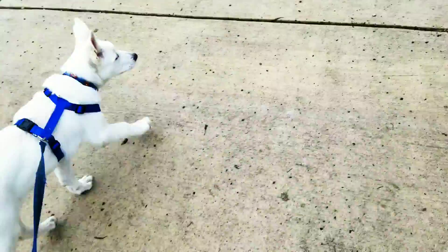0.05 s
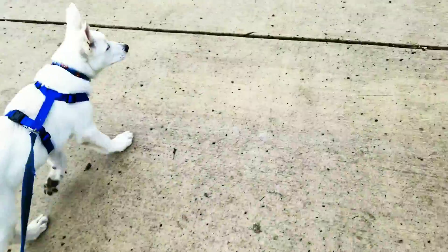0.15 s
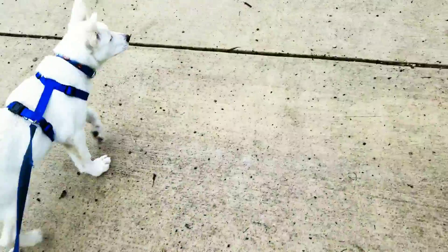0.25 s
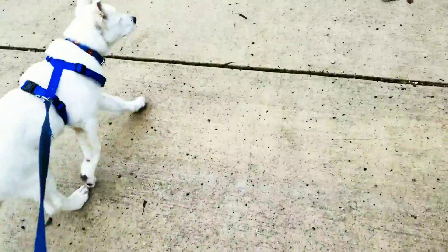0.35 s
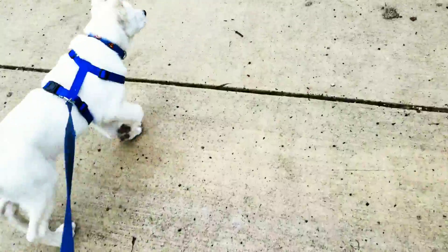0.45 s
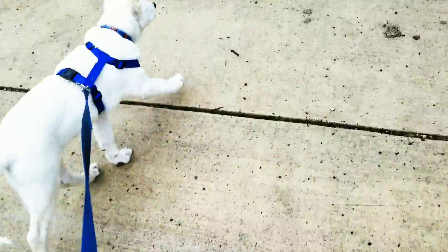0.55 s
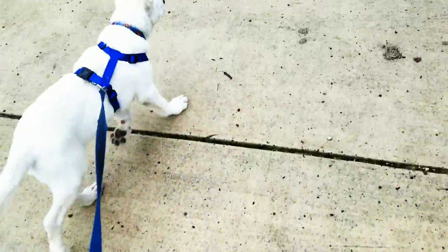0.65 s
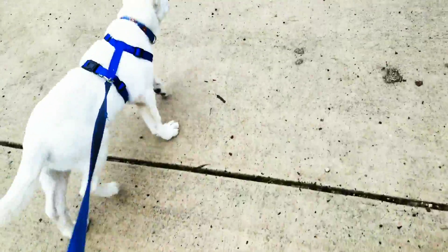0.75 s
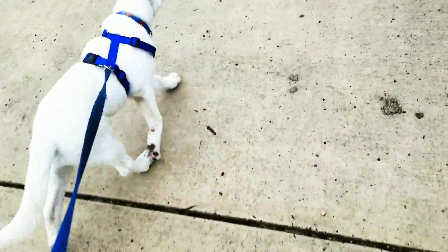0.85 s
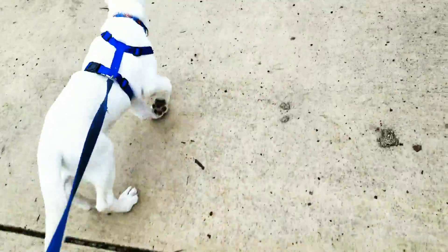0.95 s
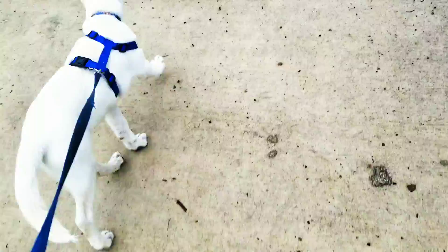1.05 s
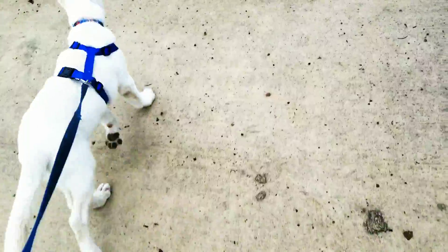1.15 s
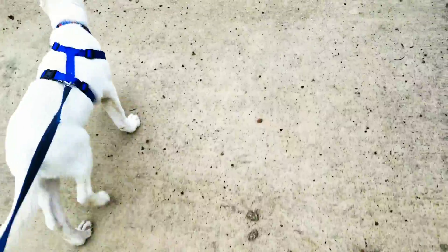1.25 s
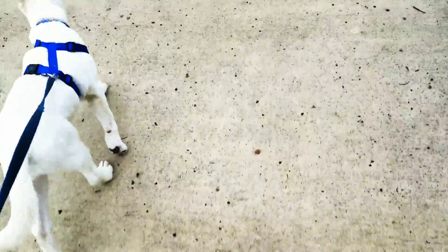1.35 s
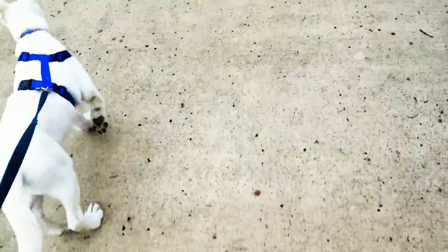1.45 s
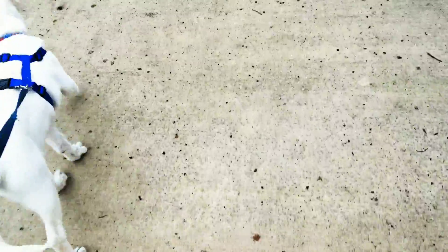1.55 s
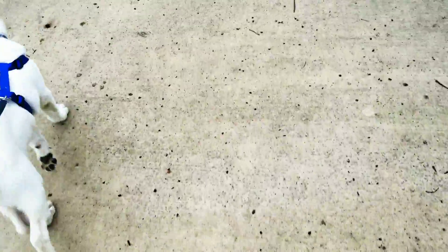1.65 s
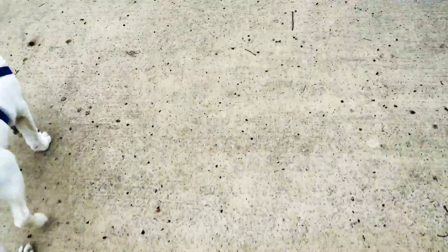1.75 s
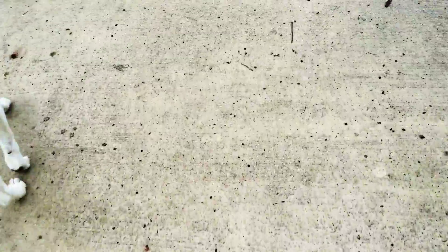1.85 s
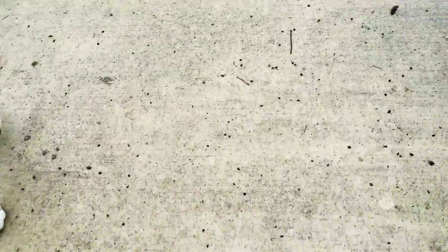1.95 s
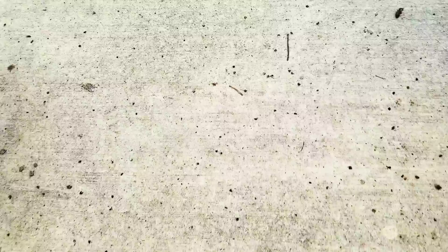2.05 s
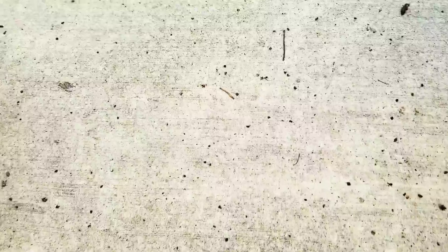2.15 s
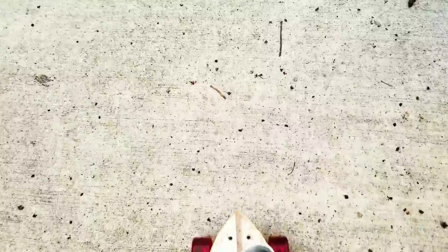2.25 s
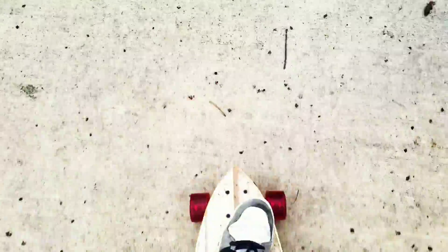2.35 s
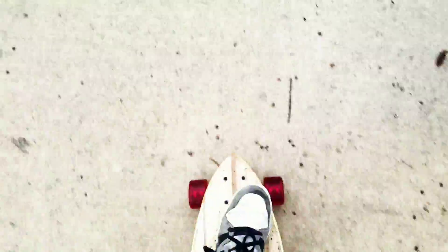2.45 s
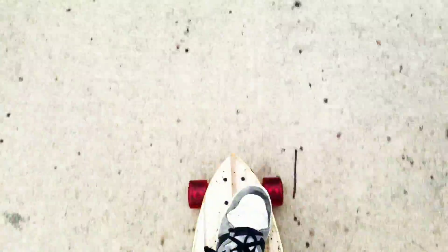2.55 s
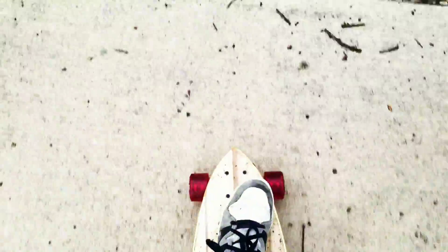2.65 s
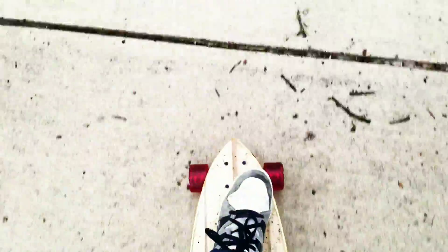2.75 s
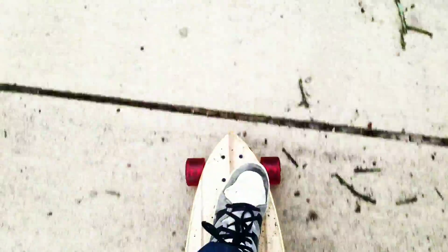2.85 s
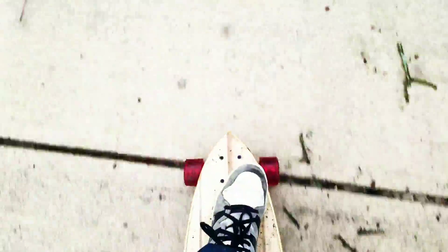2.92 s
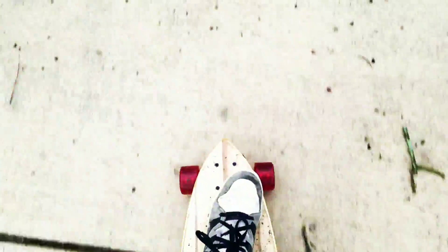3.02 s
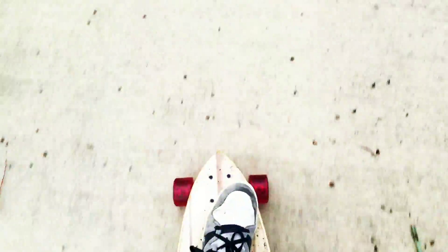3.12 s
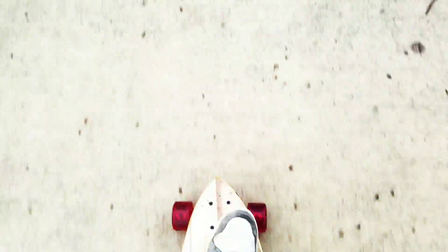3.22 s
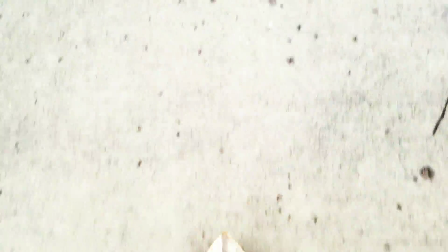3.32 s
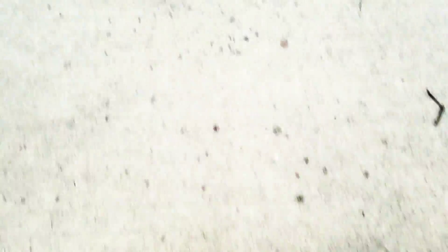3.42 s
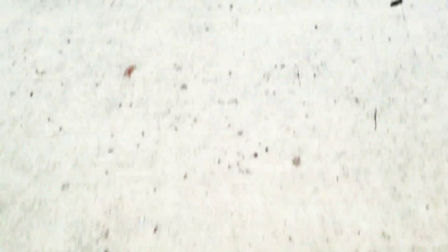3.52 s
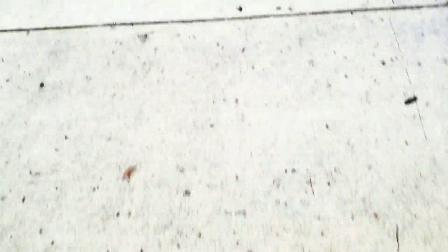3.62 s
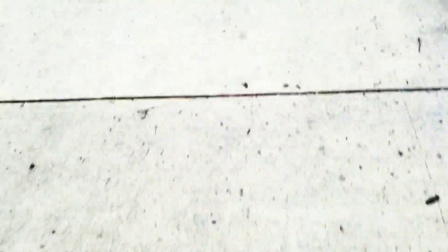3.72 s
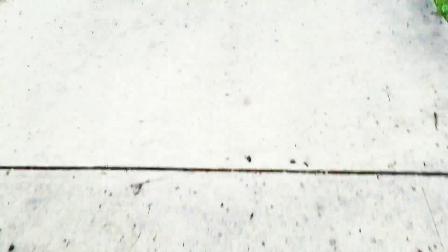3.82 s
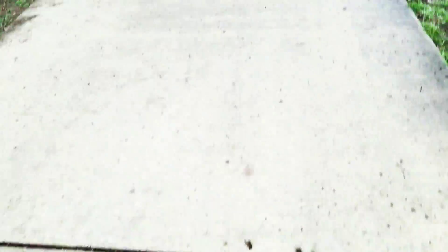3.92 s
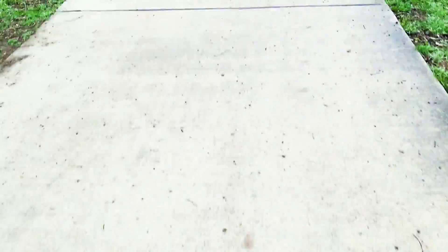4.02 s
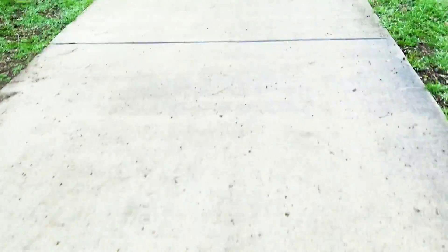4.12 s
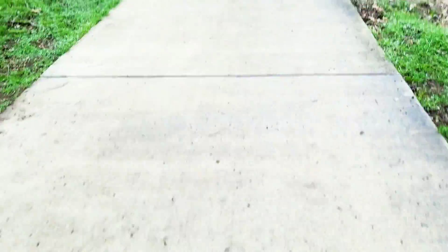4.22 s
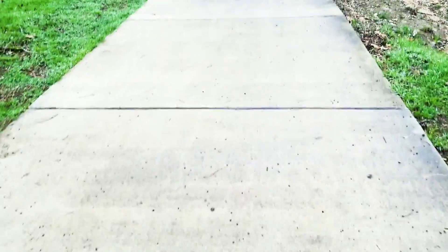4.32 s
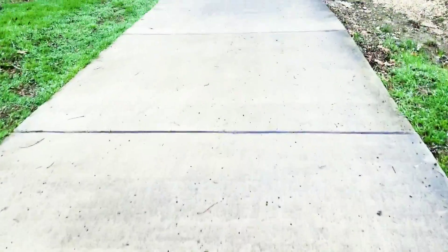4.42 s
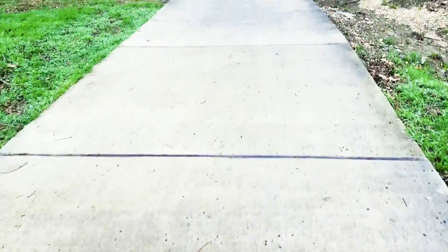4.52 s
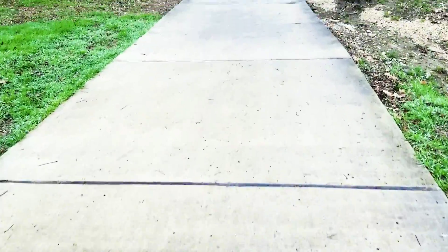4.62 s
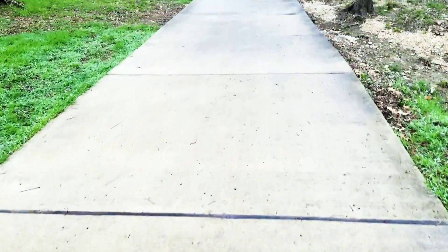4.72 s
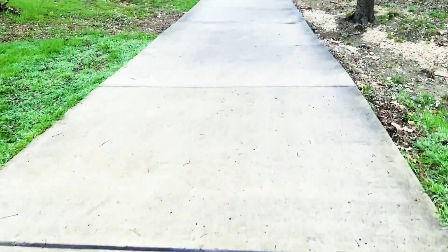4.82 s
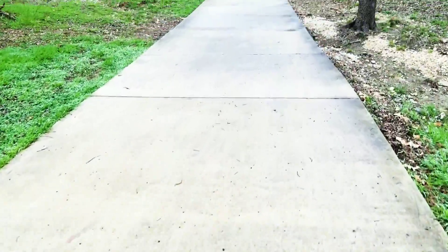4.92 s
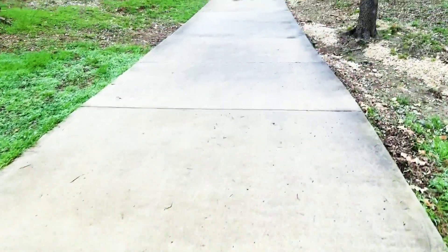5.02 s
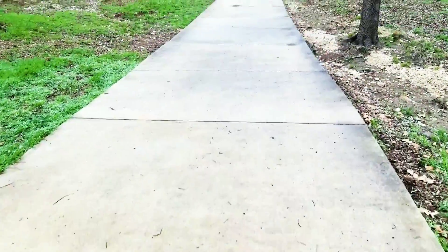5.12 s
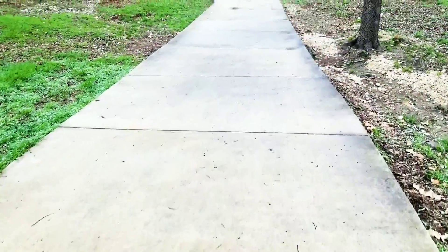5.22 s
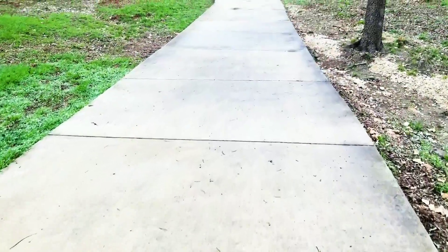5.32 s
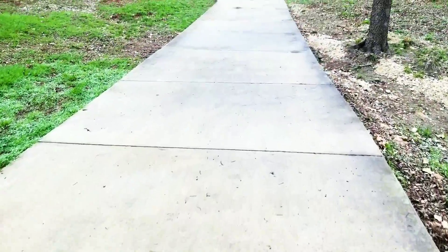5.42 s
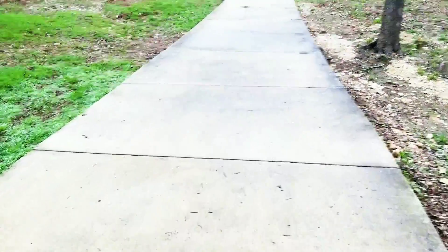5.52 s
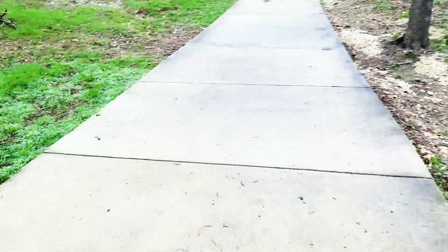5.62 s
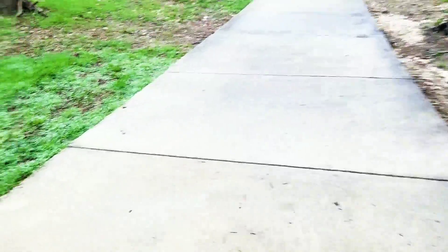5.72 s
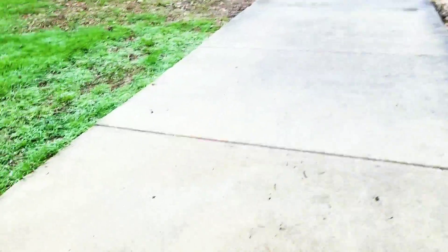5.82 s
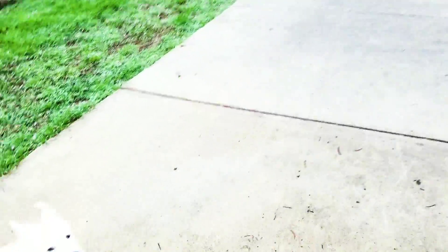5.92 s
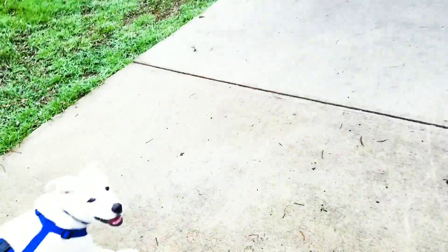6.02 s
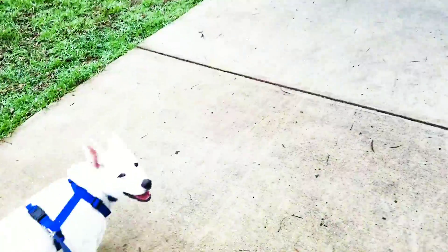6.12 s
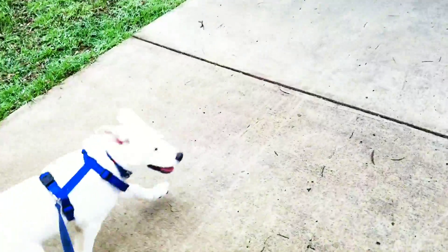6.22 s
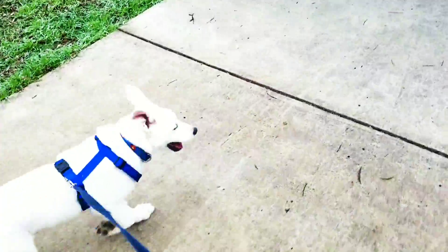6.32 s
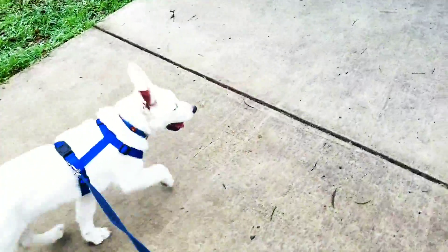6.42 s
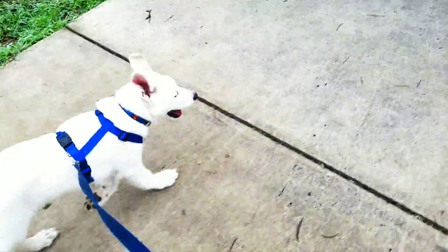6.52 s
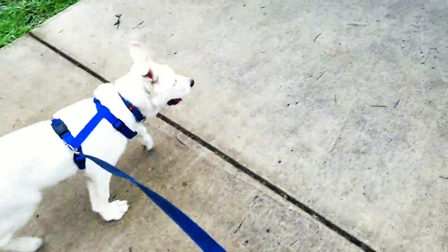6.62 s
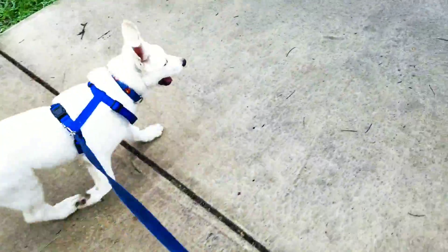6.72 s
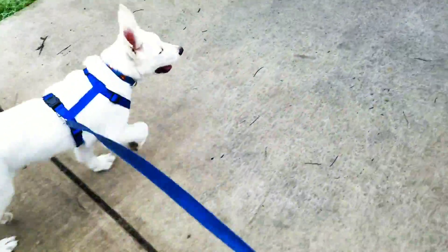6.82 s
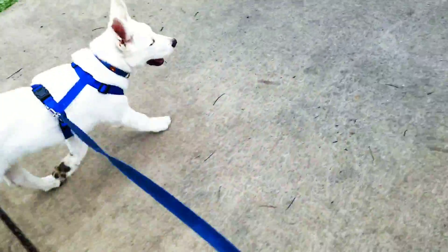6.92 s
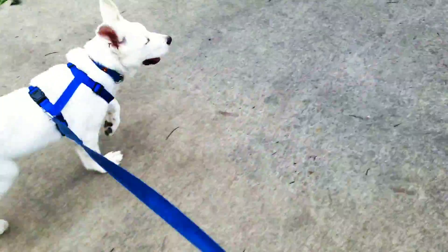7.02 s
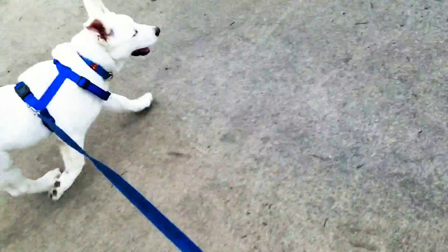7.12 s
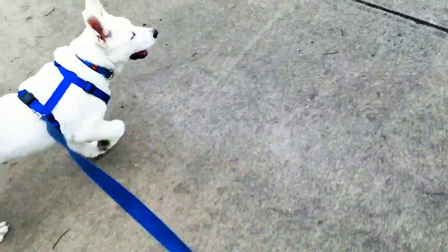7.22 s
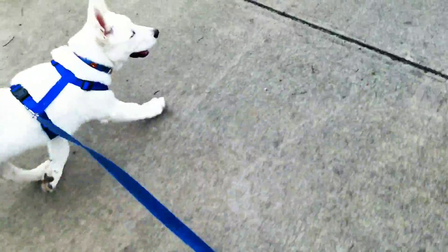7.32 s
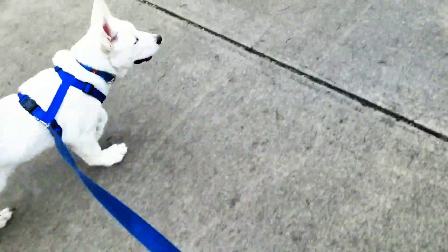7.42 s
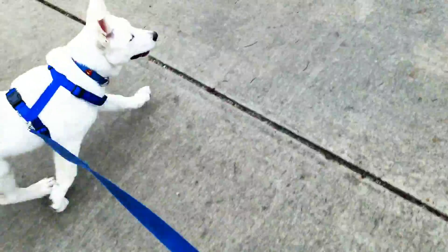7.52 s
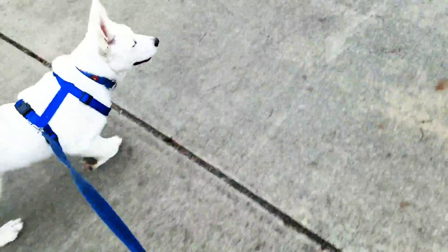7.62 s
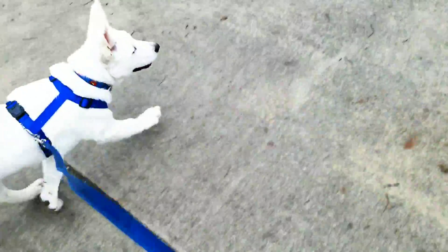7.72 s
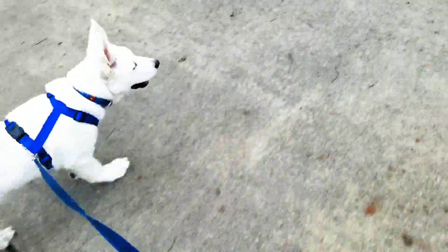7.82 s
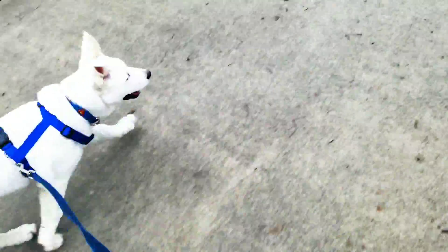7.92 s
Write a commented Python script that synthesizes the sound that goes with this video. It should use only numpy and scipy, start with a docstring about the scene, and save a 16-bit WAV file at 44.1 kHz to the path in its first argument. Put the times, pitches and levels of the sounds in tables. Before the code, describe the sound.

Close handheld stereo outdoors: skateboard wheels roll continuously on a concrete path, a muffled, uneven rumble growing louder. Every half second to a second the wheels hit a joint with a short hollow double knock and deck thump. Between them come tiny bumps, crunching sand and dry ticks of snapping grit. Soft rustles pass, mainly to the right; late on, gritty scuffs crackle slightly left and air buffets the microphone.

```python
"""A longboard rumbles over rough concrete, slowly gathering speed, heard from the rider's hand.
Noise and small bumps shaped by broad spectra make the roll; struck decaying modes make the joint knocks.
Grains of noise hiss, crunch and snap as grit under the wheels; short crackling drags scuff near the end.
Slowly varying noise is air on the microphone, over a low hum, soft rustles and a far hiss on the right."""
import sys
import numpy as np
from scipy import signal
from scipy.fft import rfft, irfft, next_fast_len
from scipy.io import wavfile

SR = 44100
rng = np.random.default_rng(int(sys.argv[2]) if len(sys.argv) > 2 else 0)


def generate_wav(sig):
    """Save sig (samples, or channels by samples) to the path in sys.argv[1] as 16-bit PCM at SR."""
    pcm = np.round(np.clip(np.atleast_2d(sig).T, -1, 1) * 32767).astype(np.int16)
    wavfile.write(sys.argv[1], SR, pcm)


N = 351036
TIME = np.arange(N) / SR
CRUISE_DB = -40  # rolling level taken as cruising pace

# pace, told by how loudly the board rolls: time_s, level_db
PACE = [(0.0, -50.5), (0.44, -52), (0.71, -48.5), (1.88, -46), (3.12, -38.5), (3.5, -40), (5.1, -40),
        (5.45, -36), (6.03, -37.5), (6.27, -36), (7.25, -36.5), (7.96, -38.5)]
# the hand turns against the board: time_s, left_minus_right_db
HAND_TURN = [(0, -1), (4.5, 0), (5.7, 0), (6.3, 1.5), (7.2, 2.5), (7.96, 2.5)]
# wheel meets a joint or pit, relative levels:
# start_s, wheel_knock_db, deck_thump_db, truck_clack_db, gritty_crack_db, pitch_semitones, ring_time_factor
WHEEL_BLOWS = [(0.6871, -31.5, -67, -66, -58, 2, 1.4), (1.3002, -21.5, -25, -29, -62, 6, 0.98),
               (1.3158, -14.5, -39, -50, -62, 1.5, 1.02), (1.3215, -28.5, -28, -46, -59, 5.5, 1.3),
               (1.328, -27, -31, -49, -62, 1.5, 1.1), (1.7729, -18.5, -42, -42, -58, 2, 1.36),
               (1.7842, -10.5, -50, -30.5, -44.5, 1.5, 0.89), (1.793, -16.5, -42, -48, -75, -4, 1.15),
               (1.8006, -13, -44, -49, -71, -1.5, 0.73), (2.3045, -17.5, -42, -31.5, -61, 2.5, 1.34),
               (2.4142, -28, -63, -48, -65, 1.5, 1.7), (2.9665, -16, -21.5, -51, -50, 1.6, 1.8),
               (2.9788, -1.5, -33, -32.5, -41.5, 0.5, 0.67), (2.985, -11.5, -23.5, -45, -48, 0.6, 0.97),
               (2.9924, -18, -39, -52, -66, -1, 0.73), (3.27, -27, -61, -56, -58, 4, 1.3),
               (3.328, -15.5, -41, -54, -53, -5.5, 0.98), (3.3409, -9.5, -35, -48, -52, -0.5, 0.64),
               (3.3493, -16.5, -24, -49, -50, 1.5, 1.4), (3.693, -33, -58, -54, -61, 1.3, 1.2),
               (4.0014, -18.5, -35, -58, -53, 0.8, 0.97), (4.1749, -23.5, -56, -44, -45, 2.5, 1.54),
               (4.3066, -24, -56, -63, -51, -1.2, 1.56), (4.4124, -8, -37, -29.5, -42, -4, 0.79),
               (4.4158, -8, -52, -33, -50, 3, 1.08), (4.424, -14, -33, -53, -50, -1, 1.3),
               (4.7424, -11, -16.5, -39, -55, 3, 1.54), (4.7528, -8, -43, -44, -43, -1, 1.2),
               (4.756, -4.5, -43, -24.5, -45, 0.9, 1.03), (4.7657, -15.5, -38, -44, -59, 1, 1.14),
               (5.214, -26.5, -50, -62, -70, 2.5, 0.86), (5.7018, -22, -21, -60, -49.5, 4.5, 0.8),
               (5.7066, -20, -42, -62, -58, 0, 0.75), (6.0187, -16.5, -34, -40.5, -61, 1, 1),
               (6.0307, -15, -28, -47, -65, -2, 0.63), (6.667, -27, -41, -55, -53, 2.5, 1.06),
               (6.9043, -12.5, -16.5, -46, -43, 1, 0.8), (6.9092, -5.5, -34, -38, -45, 1.5, 0.93),
               (6.9159, -9.5, -45, -55, -61, 0.8, 0.86), (7.196, -3.5, -21, -32.5, -40, 1, 0.89),
               (7.2096, -8, -21, -40, -60.5, 1, 0.94), (7.2129, -5, -40, -43, -55, -6, 1.12),
               (7.2223, -18.5, -43, -52, -64, 2.5, 0.91), (7.3758, -24, -51, -59, -58, -1, 0.86),
               (7.4143, -23.5, -43, -61, -71, -1, 1.3), (7.8069, -11.5, -20.5, -31.5, -42, 5, 0.53),
               (7.813, -10.5, -34, -35, -64, -1.5, 1), (7.8195, -3, -39, -47, -44, -5, 0.48)]


def rolling(patchy_db, flutter_db, bump_share):
    """Broomed concrete shakes wheels and deck with fine texture and small bumps; rough patches swell both."""
    # steady levels: cruise_db, pace_db_per_db, turn_db_per_db
    roar_law = (-43, 1, 0.57)
    whirr_law = (-47, 1.06, -2.55)
    deck_law = (-50, 0.14, 1.65)
    # rougher concrete, relative levels: start_s, length_s, whirr_db, deck_db
    rough_stretches = [(1.17, 0.058, -44, -63), (2.05, 0.79, -54, -49), (2.7, 0.03, -37, -43),
                       (2.93, 0.46, -54, -65), (5.115, 0.045, -35, -60), (5.26, 0.019, -37.5, -60),
                       (6.11, 0.045, -38, -51), (6.95, 0.16, -67, -41), (7.085, 0.085, -43.5, -46),
                       (7.41, 0.084, -43, -59), (7.89, 0.04, -46, -52)]
    # spectra: frequency_hz, density_db (per Hz, relative)
    roar_spectrum = [(180, -35), (290, -8), (370, 1.5), (430, 3.5), (490, 6.5), (540, 1.5), (640, -23),
                     (1000, -35.5), (3000, -76)]
    whirr_spectrum = [(380, -22.5), (470, 3), (540, 5), (620, 3.5), (690, -7.5), (740, -11.5), (830, -13),
                      (1000, -38), (1500, -43), (3000, -63)]
    deck_spectrum = [(30, -13.5), (65, -7), (100, -2), (165, 0), (220, -6.5), (290, -1.5), (380, -12),
                     (600, -21.5), (1500, -81.5)]

    rough_whirr, rough_deck = swells(rough_stretches, attack_s=0.017, t60_s=0.087)
    roar_gain = follow(roar_law)
    whirr_gain = together(follow(whirr_law), rough_whirr)
    deck_gain = together(follow(deck_law), rough_deck)

    bumps = bump_share * grains(per_s=220, spread_db=-1.0)[0]
    roar = coloured(stereo_noise(side_db=-24.0) + bumps, roar_spectrum)
    roar = from_db(1.5) * roar_gain * roar
    whirr = wandering(coloured(stereo_noise(side_db=-24.5) + bumps, whirr_spectrum))
    whirr = whirr_gain * whirr * from_db(flutter_db * drift(25))
    boom = from_db(4.0) * deck_gain * coloured(stereo_noise(side_db=-21.5), deck_spectrum)
    return ((roar + whirr) * panned(1.0) + boom) * from_db(patchy_db * drift(9))


def joints():
    """Soft wheels hit a joint's far edge: deck thumps, wheels knock, rims ring, trucks clack, edge crunches."""
    # decaying modes: frequency_hz, relative_db, t60_s
    deck_modes = [(180, 3, 0.032), (244, 2.5, 0.025), (141, -14, 0.059)]
    rim_modes = [(551, -27.5, 0.058)]
    truck_modes = [(1064, -15, 0.0068), (1210, -13.5, 0.036), (1520, -0.5, 0.0034), (1980, -0.5, 0.0096),
                   (2520, -4, 0.0099)]
    # crunch of the edge: frequency_hz, density_db (per Hz, relative)
    edge_spectrum = [(300, -4), (900, 11.5), (1600, 0), (2600, -8.5), (4500, -11), (7000, -18),
                     (10000, -19), (15000, -28)]
    rim_db_per_knock_db = 0.21  # weak blows ring the rim nearly as much as strong ones

    s, wheel_db, deck_db, truck_db, crack_db, semitones, sustain = np.transpose(WHEEL_BLOWS)
    # a share of every wheel knock passes through the trucks into the deck
    deck_force = clicks(s, deck_db) + 0.05 * clicks(s, wheel_db)
    thump = ring(judder(deck_force, share=0.011, t60_s=0.13), deck_modes)
    thump = from_db(5.5) * butter(thump, 114.0, "high", order=2)

    rim = ring(clicks(s, rim_db_per_knock_db * wheel_db), rim_modes)
    rim = butter(rim, 1070, "low", order=2)

    knock_rows = zip(s, wheel_db, semitones, sustain)
    knock = from_db(1.0) * knocks(knock_rows, shake=0.036, shake_t60_s=0.036, top_hz=990)

    clack = ring(judder(clicks(s, truck_db), share=0.22, t60_s=0.024), truck_modes)
    clack = from_db(-6) * butter(clack, 3160, "low", order=2)

    crack_gain = from_db(4.0) * fade(clicks(s, crack_db), t60_s=0.058, rise_s=0.00066)
    crack = crack_gain * coloured(grains(per_s=3300, spread_db=-6.5), edge_spectrum)
    return thump + knock - rim + clack + crack


def pits():
    """Small pits and stones knock the wheels at random strength and pitch, harder as the pace grows."""
    mean_per_s, cruise_knock_db, spread_db = 45, -38.5, 4
    mean_semitones, spread_semitones = 1.4, 1.45

    wait, size, pitch = rng.standard_normal((900, 3)).T
    s = np.cumsum(np.exp(wait - .5)) / mean_per_s
    pace_db = np.interp(s, *np.transpose(PACE)) - CRUISE_DB
    db = cruise_knock_db + spread_db * np.minimum(size, 1) + pace_db
    semitones = mean_semitones + spread_semitones * pitch
    rows = np.transpose([s, db, semitones, np.ones(len(s))])[s < TIME[-1]]
    return knocks(rows, shake=0.053, shake_t60_s=0.047, top_hz=790) * panned(0.0)


def knocks(rows, shake, shake_t60_s, top_hz):
    """Soft tyres ring at a pitch and length set by how they are squeezed; rows: s, dB, semitones, ring factor."""
    # wheel modes: frequency_hz, relative_db, t60_s
    wheel_modes = [(434.3, 4, 0.019), (560, 0, 0.011), (815, -18.5, 0.024)]
    out = np.zeros((2, N))
    strike = signal.unit_impulse(SR // 12)
    for s, db, semitones, sustain in rows:
        ratio = 2 ** (semitones / 12)
        modes = [(hz * ratio, level_db, t60_s * sustain) for hz, level_db, t60_s in wheel_modes]
        knock = from_db(db) * ring(judder(strike, shake, shake_t60_s), modes)
        at = int(s * SR)
        out[:, at:at + len(strike)] += knock[:, :N - at]
    return butter(butter(out, top_hz, "low", order=2), 69, "high", order=1)


def sand():
    """Wheels grind sand, more in patches and after blows: coarse crunch, fine crackling hiss, dust sizzle."""
    # steady levels: cruise_db, pace_db_per_db, turn_db_per_db
    grind_law = (-70.5, 0.57, -0.74)
    hiss_law = (-75, 0.31, -1)
    # sandy patches, relative levels: start_s, length_s, coarse_db, fine_db
    sandy_patches = [(0.64, 0.72, -96, -78), (2.08, 0.5, -67.5, -76), (2.73, 0.25, -90, -65.5),
                     (3.19, 0.13, -62.5, -70), (3.95, 1.09, -69, -72.5), (5.03, 0.69, -81, -67),
                     (5.72, 1.2, -71, -72), (6.03, 0.29, -68, -75), (6.86, 0.24, -62.5, -66)]
    # finest dust: start_s, length_s, relative_db
    dust_events = [(5.05, 0.47, -67.5)]
    # spectra: frequency_hz, density_db (per Hz, relative)
    grind_spectrum = [(400, -2), (800, 12.5), (1150, 4), (1700, 8), (2400, -8.5), (3200, -7.5),
                      (5000, -10.5), (8000, -29), (16000, -32)]
    hiss_spectrum = [(1500, -15), (3500, -2), (6000, 0), (8500, 2.5), (12000, -1), (15500, 1.5)]
    dust_spectrum = [(6000, -15), (9500, -15), (11500, -6), (12900, 0), (13800, -7), (15500, -12)]
    stir_db_per_knock_db = 0.33  # harder blows stir a little more grit

    s, knock_db = np.transpose(WHEEL_BLOWS)[:2]
    stirred = fade(clicks(s, stir_db_per_knock_db * knock_db), t60_s=0.55, rise_s=0.0056)
    patch_coarse, patch_fine = swells(sandy_patches, attack_s=0.096, t60_s=0.7)
    coarse_gain = together(follow(grind_law), patch_coarse, from_db(-69.5) * stirred)
    fine_gain = together(follow(hiss_law), patch_fine, from_db(-81) * stirred)
    dust_gain, = swells(dust_events, attack_s=0.29, t60_s=0.55)

    crunch = stereo_noise(side_db=-2.5) + 0.92 * grains(per_s=500, spread_db=0.5)
    crunch = from_db(4.5) * coarse_gain * coloured(crunch, grind_spectrum)
    crackle = grains(per_s=900, spread_db=2.9)
    hiss = coloured(stereo_noise(side_db=0.0) + 0.82 * crackle, hiss_spectrum)
    hiss = from_db(5.0) * fine_gain * hiss * panned(-2.5)
    sizzle = dust_gain * coloured(grains(per_s=3300, spread_db=4.5), dust_spectrum) * panned(-7.0)
    return crunch * from_db(0.55 * drift(24)) + hiss * from_db(1.3 * drift(26)) + sizzle


def snaps(high_edge, width, t60_s, crumble_db, crumble_t60_s):
    """Grains and twigs burst with a dry crack, full or thin, ringing or dead, then crumble briefly."""
    # start_s, relative_db, pitch_hz, resonance_db, lowest_hz, left_minus_right_db
    snap_events = [(0.2318, -35.5, 5200, 5, 4400, 0), (0.9525, -51, 5120, 7, 3000, -10),
                   (1.1674, -46, 5170, 7, 2950, -6), (1.275, -40, 4830, -6, 3000, -4),
                   (1.301, -31.5, 5460, 8, 2200, -9), (2.3048, -22.5, 3900, 8, 1200, -1),
                   (2.3258, -33.5, 9700, 9, 4200, -1), (2.4154, -33.5, 5850, 5, 5000, 1),
                   (2.429, -44, 4840, 2, 3500, -15), (2.5648, -39.5, 13670, 12, 5500, 0),
                   (2.9329, -35, 11000, 8, 4750, -2), (2.991, -43, 4900, 15, 2200, -25),
                   (3.27, -28, 4230, 8, 2800, 3), (3.6944, -21.5, 4640, 11.5, 1400, -0.5),
                   (3.987, -35, 5700, 23, 4200, 1), (3.998, -34.5, 11800, 5, 4600, 6),
                   (4.176, -30, 5870, 5, 2200, 0), (4.794, -47, 11000, 2, 4500, 0),
                   (4.8353, -41, 5530, 1, 4000, -2), (4.892, -47, 5400, 10, 4000, -6),
                   (4.9537, -36.5, 13500, 9, 6500, 5), (5.075, -41, 13000, 3, 4500, -6),
                   (5.243, -47, 5000, 17, 4200, -5), (5.46, -50, 11500, 2, 4500, 0),
                   (5.647, -42, 12500, 1, 8000, 2), (5.683, -42, 11500, -7, 6000, 0),
                   (5.704, -40, 11000, -7, 4500, 0), (5.78, -38.5, 11000, 5, 4200, 3),
                   (5.883, -49, 6200, 4, 4000, 14), (5.974, -47, 10000, 1, 6000, 10),
                   (6.512, -41.5, 4920, 0, 3000, -2), (6.611, -43, 2500, 9, 900, -7),
                   (6.657, -40, 9000, 0, 2500, 1), (6.693, -40, 3000, 2, 1000, 3),
                   (6.721, -32, 9600, 12, 2500, 10), (6.738, -35, 4000, 4, 1200, 5),
                   (6.767, -43, 6000, 0, 1500, 9)]
    break_height = 4  # clean first break against the noise that follows it
    out = np.zeros((2, N))
    t = np.arange(SR // 8) / SR
    for s, db, hz, ring_db, lowest_hz, pan_db in snap_events:
        crack, crumbs = rng.standard_normal((2, 2, len(t)))
        crack = break_height * (t == 0) + crack * decay(t, t60_s)
        # the grain's own resonance, its width a share of its pitch
        crack = port(crack, [(min(hz, .45 * SR), width * hz, ring_db)])
        burst = crack + from_db(crumble_db) * crumbs * decay(t, crumble_t60_s)
        burst = butter(burst, lowest_hz, "high", order=3)
        burst = butter(burst, high_edge * hz, "low", order=1)
        # unit power over the first 4 ms
        burst /= np.sqrt(np.mean(burst[:, :SR // 250] ** 2, axis=1, keepdims=True))
        at = int(s * SR)
        out[:, at:at + len(t)] += (from_db(db) * panned(pan_db) * burst)[:, :N - at]
    return from_db(-15.5) * out


def scuff():
    """Short drags catch and slip over gritty concrete, crackling, a little to the left."""
    # start_s, length_s, level_db
    scuff_events = [(6.585, 0.1, -56.5), (6.635, 0.13, -51), (6.69, 0.038, -55), (7.015, 0.076, -57)]
    # frequency_hz, density_db (per Hz, relative)
    scuff_spectrum = [(300, -36), (900, 10.5), (1500, 5), (2500, 0.5), (4500, -2.5), (7000, -7),
                      (10000, -12), (15000, -27)]
    level, = swells(scuff_events, attack_s=0.028, t60_s=0.17)
    crackle = from_db(1.8 * drift(110)) * grains(per_s=4200, spread_db=1.6)
    return level * coloured(crackle, scuff_spectrum) * panned(5)


def surroundings(hum_hz, gust_db):
    """Lumpy air at each port, a low wavering hum, and a rustle and a steady far hiss from the right."""
    # low hum: time_s, relative_db
    hum_curve = [(0, -50), (1.5, -50.5), (3, -50), (4.5, -53), (7.96, -86)]
    # soft rustles close by, then gusts on the microphone: start_s, length_s, relative_db
    rustle_events = [(0.13, 0.16, -69.5), (1.12, 0.27, -71), (1.76, 0.62, -66), (2.04, 0.26, -58.5),
                     (2.92, 2.4, -71.5), (6.05, 0.087, -65), (6.55, 0.49, -68), (6.32, 0.065, -63)]
    gust_events = [(4.48, 0.33, -52.5), (5.42, 0.11, -41.5), (5.68, 0.21, -46.5), (6.62, 0.27, -45),
                   (7.57, 0.12, -43.5), (7.85, 0.11, -39.5)]
    # steady wind: cruise_db, pace_db_per_db, turn_db_per_db
    wind_law = (-59.5, 0.74, 3.8)
    # spectra: frequency_hz, density_db (per Hz, relative)
    wind_spectrum = [(12, -5), (40, -12.5), (80, 3.5), (130, -7), (250, -22.5), (800, -53), (2000, -79)]
    rustle_spectrum = [(700, -16.5), (1300, 0.5), (1900, 4), (2600, 7.5), (3200, -10.5), (4200, 0),
                       (5000, -2), (5900, -1.5), (7000, -16), (14000, -33.5)]
    far_spectrum = [(200, 5), (900, -7), (1350, -25.5), (1800, 9), (2250, 5), (2650, 7.5), (3200, -8.5),
                    (5200, -27.5), (7000, -43), (15000, -47.5)]

    hum_gain, = gains(hum_curve)
    rustle_gain, = swells(rustle_events, attack_s=0.047, t60_s=0.43)
    wind_gain = together(follow(wind_law), *swells(gust_events, attack_s=0.063, t60_s=0.31))

    air = from_db(3.0) * wind_gain * coloured(stereo_noise(side_db=0.0), wind_spectrum)
    air = air * from_db(gust_db * drift(3.9))
    pitch_hz = hum_hz * (1 + 0.033 * drift(8.4))
    hum = hum_gain * np.sin(2 * np.pi * np.cumsum(pitch_hz) / SR) * from_db(2.7 * drift(4.5))
    rustle = coloured(stereo_noise(side_db=3.5), rustle_spectrum)
    rustle = from_db(-4.5) * rustle_gain * rustle * panned(-13.5)
    far = from_db(-71.5) * coloured(stereo_noise(side_db=3.0), far_spectrum) * panned(-10.5)
    return air + hum + rustle + far


def outdoors(x, t60_s, wet_db):
    """Faint scatter from ground and trees: a decaying noise tail after 8 ms."""
    t = np.arange(SR // 2) / SR
    tail = rng.standard_normal((2, len(t))) * decay(t, t60_s) * (t > .008)
    tail /= np.sqrt(np.sum(tail ** 2, axis=1, keepdims=True))
    return x + from_db(wet_db) * signal.fftconvolve(x, tail, axes=1)[:, :N]


def towards_hand(x, lag_s):
    """Level difference follows the hand; the board, nearer the left port, reaches the right a little later."""
    turn, = gains(HAND_TURN)
    left = x[0] * np.sqrt(turn)
    right = np.interp(TIME - lag_s, TIME, x[1]) / np.sqrt(turn)
    return np.array([left, right])


def from_db(db):
    """Decibels to gain."""
    return 10 ** (np.asarray(db) / 20)


def decay(t, t60_s):
    """Exponential decay of 60 dB in t60_s."""
    return np.exp(-np.log(1000) * t / t60_s)


def rms_one(x):
    """Scale to unit power."""
    return x / np.sqrt(np.mean(x ** 2) + 1e-20)


def gains(rows):
    """One gain curve for each dB column."""
    s, *columns = np.transpose(rows)
    return [from_db(np.interp(TIME, s, column)) for column in columns]


def follow(law):
    """Gain of a sound that changes with the pace and as the hand turns."""
    db, per_pace, per_turn = law
    pace_db = np.interp(TIME, *np.transpose(PACE))
    turn_db = np.interp(TIME, *np.transpose(HAND_TURN))
    return from_db(db + per_pace * (pace_db - CRUISE_DB) + per_turn * turn_db)


def swells(rows, attack_s, t60_s):
    """Each event rises, holds to the end of its length and dies away; one gain curve per dB column."""
    power = 0
    for start, length, *db in rows:
        rise = np.clip((TIME - start) / attack_s, 0, 1)
        fall = decay(np.clip((TIME - start - length) / t60_s, 0, 2), 1)
        power = power + (from_db(db)[:, None] * rise * fall) ** 2
    return np.sqrt(power)


def together(*levels):
    """Unrelated sounds add in power."""
    return np.sqrt(sum(level ** 2 for level in levels))


def drift(rate):
    """Slow random curve of unit power, with two random knots per cycle of rate (Hz)."""
    knots = rng.standard_normal(4000)
    return rms_one(np.interp(TIME * rate * 2, np.arange(len(knots)), knots))


def wandering(x):
    """The wheels' ring wanders with the load on them: time warping slides its resonances up and down."""
    pitch_share, rate_hz = 0.06, 7
    warped = TIME + np.cumsum(pitch_share * drift(rate_hz)) / SR
    return np.array([np.interp(warped % TIME[-1], TIME, side) for side in x])


def stereo_noise(side_db, size=N):
    """White noise common to both sides plus a part in which they differ."""
    mid, side = rng.standard_normal((2, size))
    return mid + from_db(side_db) * side * [[1], [-1]]


def panned(db):
    """Left and right gains for a left-minus-right level."""
    return from_db(np.array([[db], [-db]]) / 2)


def grains(per_s, spread_db):
    """Random tiny impacts of uneven size, reaching each side with its own strength; unit power."""
    sizes = from_db(spread_db * np.minimum(rng.exponential(1, N), 5))
    hits = rng.random(N) < per_s / SR
    return rms_one(hits * sizes * rng.standard_normal((2, N)))


def clicks(times_s, db):
    """One impulse per blow."""
    out = np.zeros(N)
    out[(np.asarray(times_s) * SR).astype(int)] = from_db(db)
    return out


def judder(strike, share, t60_s):
    """A strike followed by uneven shaking, a little different on each side."""
    shaking = fade(strike, t60_s, rise_s=0.00032) * stereo_noise(side_db=-14.5, size=len(strike))
    return strike + share * shaking


def fade(force, t60_s, rise_s):
    """An envelope that swells after each impulse, then dies away."""
    soft = np.exp(-1 / (rise_s * SR))
    poles = [soft, decay(1 / SR, t60_s)]
    return signal.lfilter([1 - soft], np.poly(poles), force + 1e-18)


def ring(force, modes):
    """Struck decaying modes; neighbours swing oppositely, so the knock swells over a cycle or two."""
    out = 0
    for k, (hz, db, t60_s) in enumerate(modes):
        r = decay(1 / SR, t60_s)
        w = 2 * np.pi * hz / SR
        mode = signal.lfilter([0, np.sin(w)], [1, -2 * r * np.cos(w), r * r], force + 1e-18)
        out = out + (-1) ** k * from_db(db) * mode
    return out


def butter(x, hz, kind, order):
    """Causal low- or high-pass."""
    sos = signal.butter(order, min(hz, .45 * SR), kind, fs=SR, output="sos")
    return signal.sosfilt(sos, x + 1e-18)


def coloured(x, spectrum):
    """Give a steady excitation a spectrum; unit power."""
    hz, db = np.transpose(spectrum)
    size = next_fast_len(N)
    bins_hz = np.maximum(np.arange(size // 2 + 1) * SR / size, 1)
    shape = from_db(np.interp(np.log(bins_hz), np.log(hz), db))
    return rms_one(irfft(rfft(x, size) * shape, size)[..., :N])


def port(x, resonances):
    """A chain of peaks and notches."""
    for hz, width_hz, db in resonances:
        w = 2 * np.pi * hz / SR
        a = from_db(db / 2)
        k = np.sin(w) * width_hz / (2 * hz)
        middle = -2 * np.cos(w)
        x = signal.lfilter([1 + k * a, middle, 1 - k * a], [1 + k / a, middle, 1 - k / a], x)
    return x


def scene():
    """Everything as it reaches the rider's hand."""
    board = outdoors(joints(), t60_s=0.22, wet_db=-38.5) + pits()
    board = board + rolling(patchy_db=-0.7, flutter_db=2.5, bump_share=0.42)
    grit = snaps(high_edge=0.93, width=0.33, t60_s=0.018, crumble_db=-17, crumble_t60_s=0.15)
    grit = grit + sand() + scuff()
    return towards_hand(board, lag_s=.00008) + grit + surroundings(hum_hz=71.7, gust_db=-1.5)


def record(dry):
    """Each microphone port colours its side; a steep low-pass cuts the top."""
    # port resonances and notches: frequency_hz, width_hz, gain_db
    left_port = [(484, 350, -1), (8140, 2900, -10), (11200, 11100, 8.5), (15000, 2300, 0)]
    right_port = [(780, 1360, -2.5), (1810, 1700, 3.5), (3200, 800, -7), (5000, 1460, 10), (8300, 6400, -9),
                  (12650, 1400, 5.5), (15000, 2500, -8.5)]
    cutoff_hz = 15700
    heard = np.array([port(dry[0], left_port), port(dry[1], right_port)])
    return signal.sosfilt(signal.ellip(10, .2, 80, cutoff_hz, fs=SR, output="sos"), heard)


dry = scene()
out = record(dry)
generate_wav(out)
```